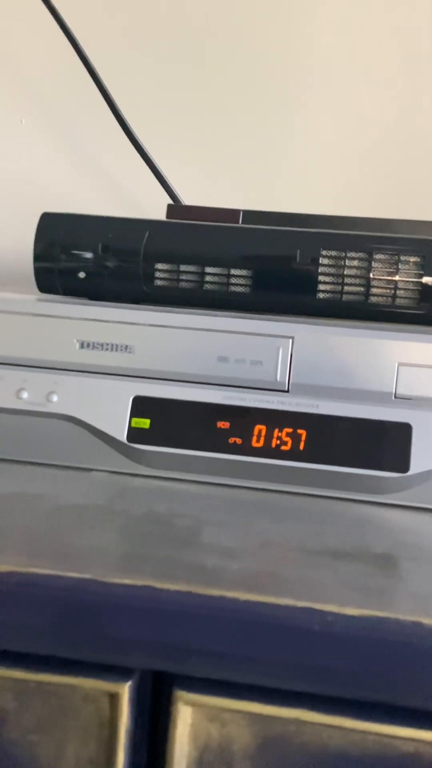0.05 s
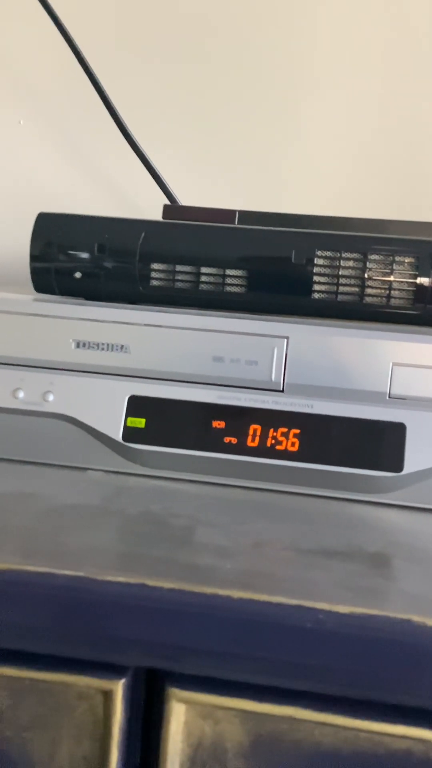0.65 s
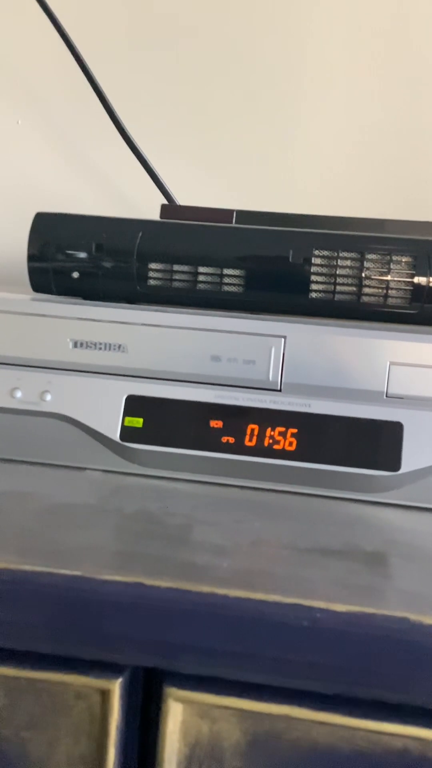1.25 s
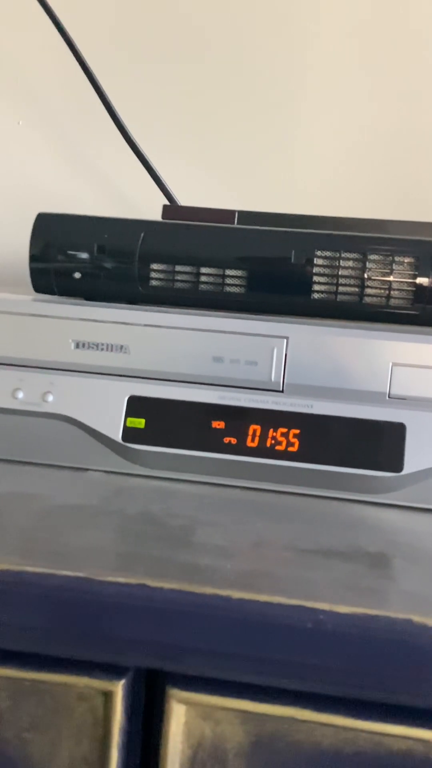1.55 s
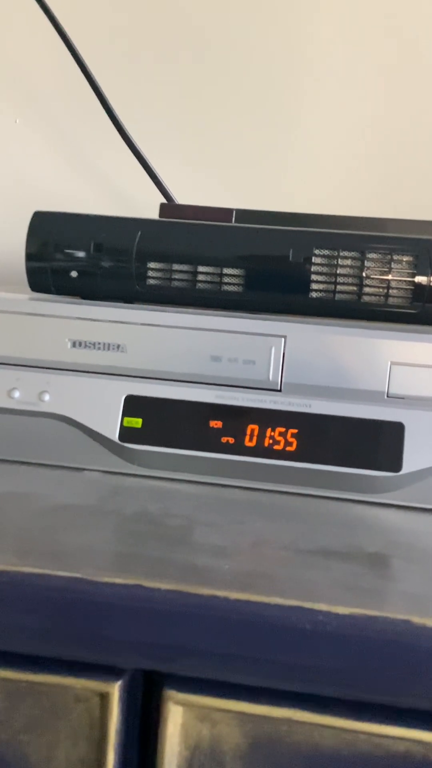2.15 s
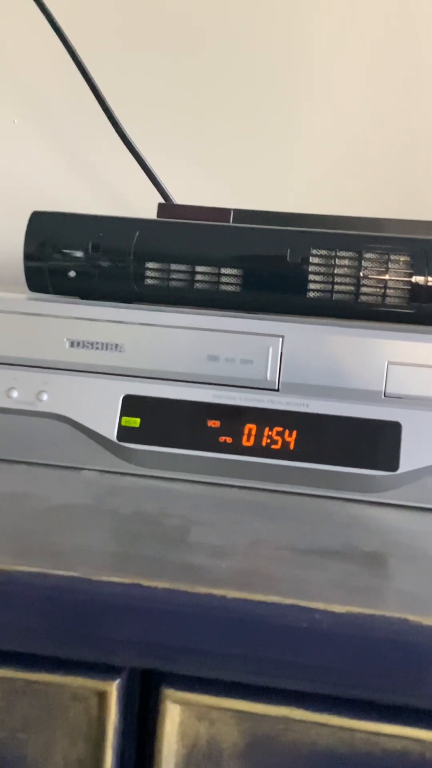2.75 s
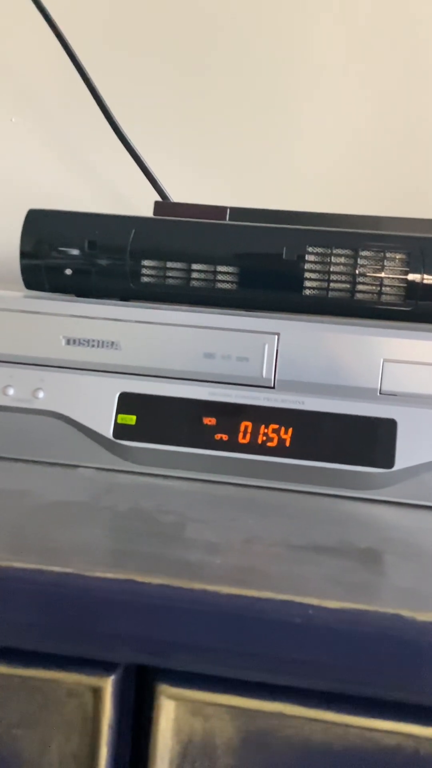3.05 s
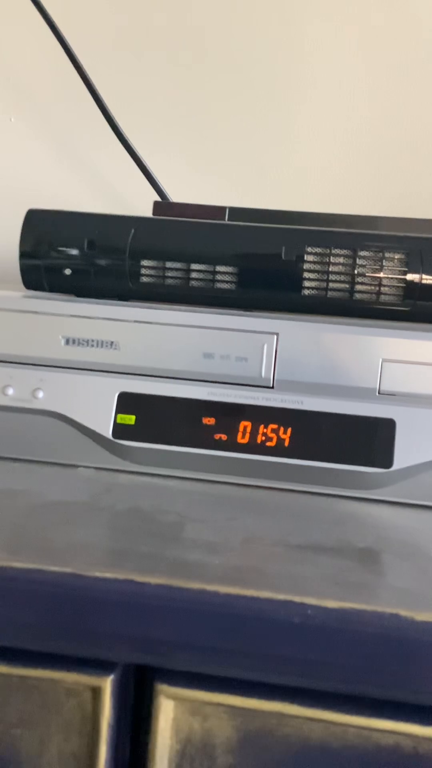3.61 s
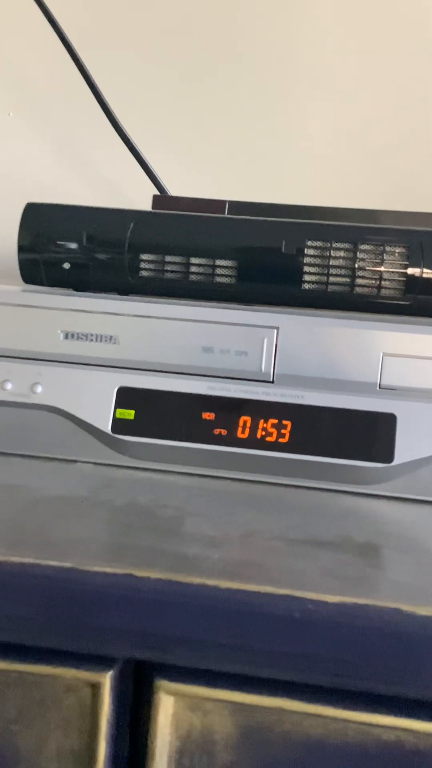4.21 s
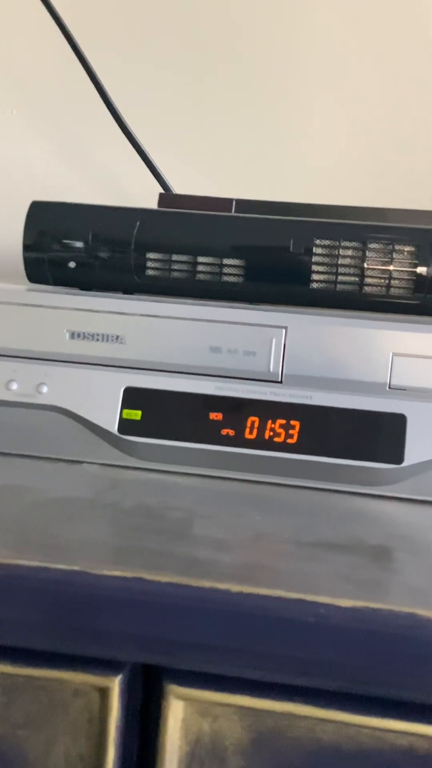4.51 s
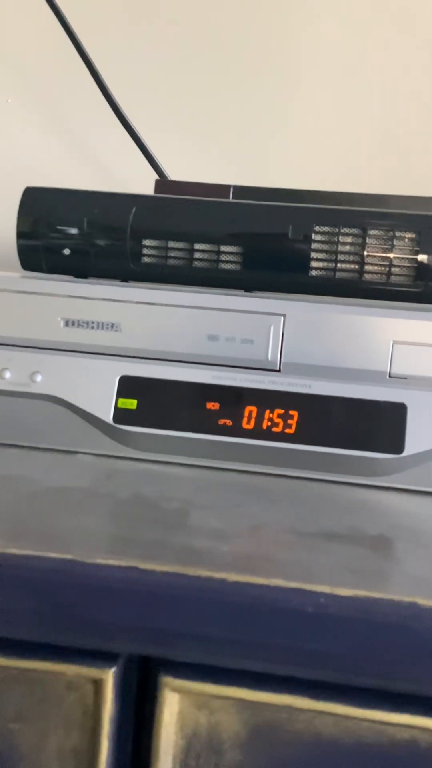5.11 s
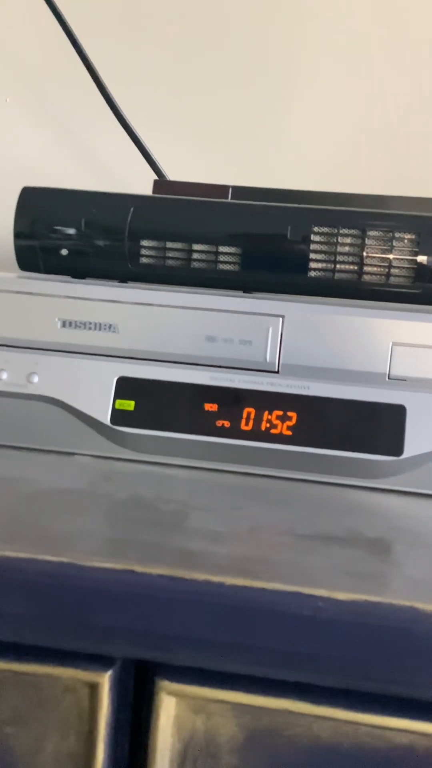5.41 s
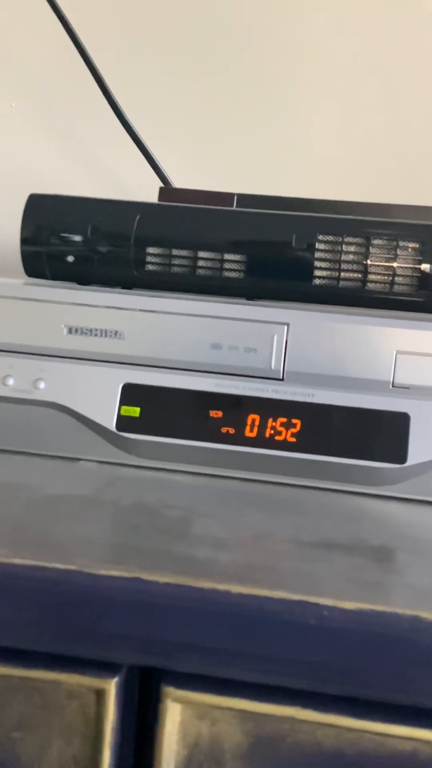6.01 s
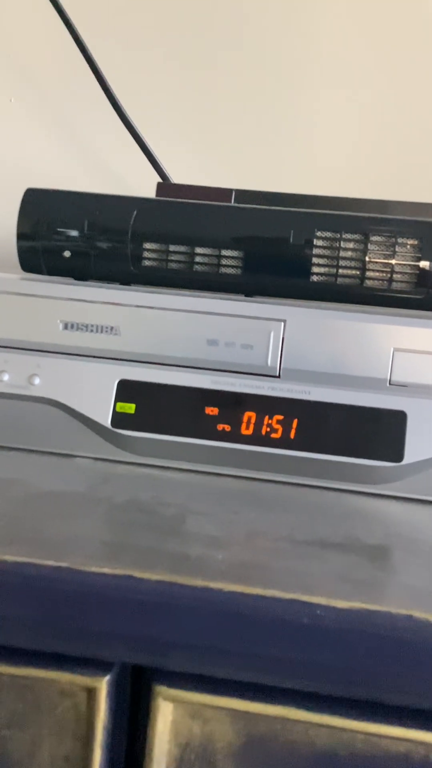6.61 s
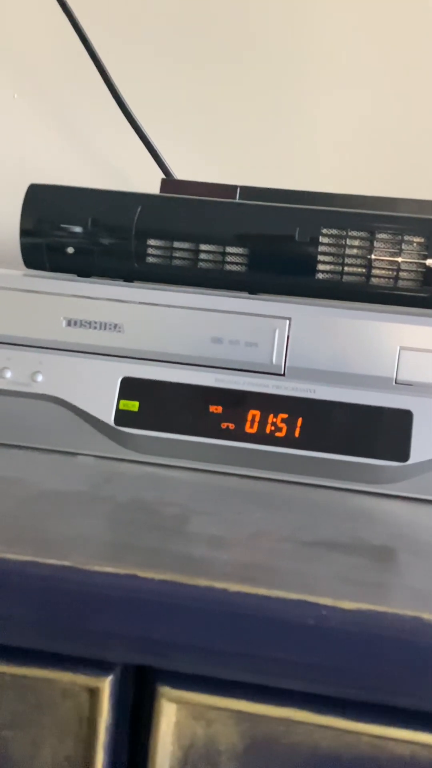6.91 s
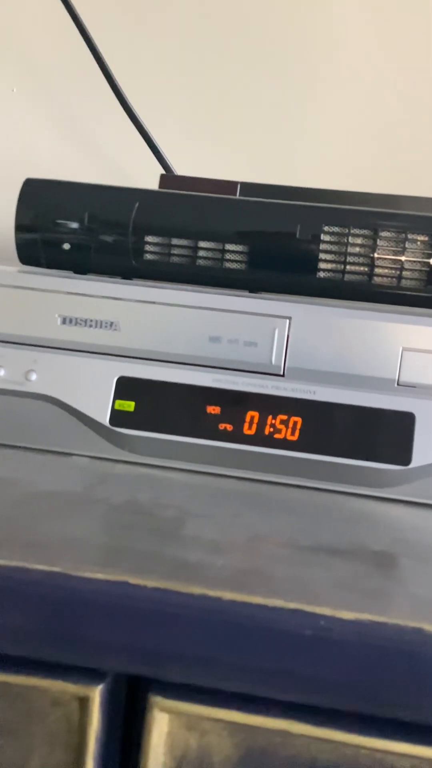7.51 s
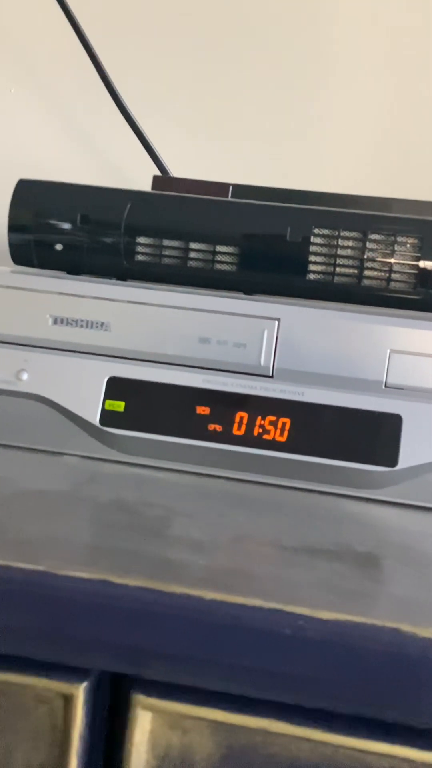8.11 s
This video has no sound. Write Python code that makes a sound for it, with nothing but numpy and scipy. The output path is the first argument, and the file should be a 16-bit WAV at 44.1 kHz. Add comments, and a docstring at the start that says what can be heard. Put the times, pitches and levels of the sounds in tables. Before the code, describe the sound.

A video cassette recorder rewinds a tape close by, with a steady motor whine, whirring hiss and rapid scraping that suddenly turns duller.

```python
"""In a quiet room, close by, a video cassette recorder rewinds a tape.
A reel scrapes twelve times a second, chopped by the drive wheel; the scraping is bright and ticks
at first, then suddenly turns duller. The motor whines and flutters once a turn, tape and bearings
whir, the gears hum, and the deck chatters and chirps under its load.
Underneath, a hand bumps and rustles softly, and a finger knocks twice on the casing."""
import sys
import numpy as np
from scipy import signal
from scipy.fft import rfft, irfft, next_fast_len
from scipy.io import wavfile
from scipy.ndimage import uniform_filter1d

SR = 44100
rng = np.random.default_rng(int(sys.argv[2]) if len(sys.argv) > 2 else 0)


def log_audio(samples):
    """Write samples as a 16-bit WAV file to the path given in sys.argv[1]."""
    # one column per channel
    frames = np.atleast_2d(samples).T
    # limit to full scale, then quantise
    limited = np.clip(frames, -1, 1)
    pcm = np.round(limited * 32767).astype(np.int16)
    wavfile.write(sys.argv[1], SR, pcm)


N = 368235
MOTOR_HZ, WHEEL_HZ, REEL_HZ = 24.958, 23.39, 12.203  # turns per second
ROUND_TURNS = 23  # wheel turns in one "round", after which reel and wheel are back in step


# how hard the wobbling reel presses (position [share of a turn], pressure [dB])
REEL_WOBBLE = [(0, 7), (.12, 12), (.18, 11.5), (.25, 3), (.32, 9.5), (.42, -5.5), (.61, -1.5), (.69, -0.5),
               (.76, 7.5), (.89, 7)]
# high spots of the drive wheel (position [share of a turn], pressure [dB])
WHEEL_SPOTS = [(0, 9), (.06, 2.5), (.18, -2), (.23, 12.5), (.3, -22), (.345, -20), (.38, 11), (.44, 4.5),
               (.55, -3.5), (.63, 8.5), (.68, 9.5), (.72, 3.5), (.92, 3)]
# how the dull scraping grows (time [s], relative level [dB])
DULL_LEVELS = [(0, -64), (3.4, -59.5), (3.7, -60.5), (6, -59.5), (8.35, -59.5)]
# tone of the dull scraping, the bright sizzle and the ticks (frequency [Hz], gain [dB])
DULL_TONE = [(2500, -35), (4400, -4.5), (5400, -34), (6350, -9), (6650, -5.5), (7200, -8.5), (8100, -22),
             (8700, -16.5), (9450, -1.5), (10050, -4), (10550, -16), (12850, -14.5), (13200, -10.5),
             (13750, -13), (14250, -18), (14600, -38)]
SIZZLE_TONE = [(4000, -56), (5600, -38), (6300, -14), (6600, -12), (7500, -4), (8550, -4.5), (9000, -5),
               (9450, 3.5), (10100, 0.5), (10600, -1.5), (11500, -2), (12000, -0.5), (12850, -10),
               (13200, -8), (13750, -8), (14200, -12), (14700, -50), (15600, -46)]
TICK_TONE = [(5000, -21), (6300, -13), (6700, -5.5), (8400, -21), (9400, 7), (10100, 4), (10900, -1),
             (12000, 4), (12800, -6), (13700, -1.5), (14600, -30), (15600, -31)]
# pitches at which the cassette shell and the cabinet ring (pitch [Hz], width [Hz], boost [dB])
SHELL_RINGS = [(6715, 184, 11), (7240, 130, 4.5), (9030, 230, 4), (9460, 270, 4.5), (9620, 110, -1),
               (10200, 150, 0.5), (10560, 160, -3), (11200, 130, 5), (11340, 210, -9), (12750, 250, -2),
               (13170, 250, 0.5)]
CABINET_RINGS = [(123, 26, -7.5), (254, 16, 1.5), (288, 25, 4.5), (354, 32, 1.5), (800, 16, -2),
                 (830, 40, 1.5), (1393, 72, -5), (1530, 120, 1), (1988, 56, -7), (2070, 43, 4),
                 (2173, 40, 3), (2337, 27, 6), (2414, 85, -10.5), (2506, 51, 6), (2680, 67, -7),
                 (2930, 69, 1.5), (3140, 53, 4), (3244, 52, -5), (3336, 64, 4), (3550, 82, -5),
                 (3850, 70, -3.5), (4960, 46, 0), (5710, 110, -4), (6150, 73, 2)]

def scrape(bright_db=-47.5, bright_until_s=3.478, slips_per_s=1200, slip_s=0.0032, contrast=0.79):
    """The reel rubs hardest where its wobble meets a high spot of the wheel, and rings the shell."""
    pressure = (per_turn(REEL_WOBBLE, REEL_HZ) * per_turn(WHEEL_SPOTS, WHEEL_HZ)) ** contrast
    # steady rubbing plus many tiny slips, each starting at once and dying in milliseconds
    slips = (rng.random(N) < slips_per_s / SR) * SR / slips_per_s
    decay = np.exp(-1 / (slip_s * SR))
    slipping = signal.lfilter([1 - decay], [1, -decay], slips * pressure ** 2)
    friction = unit(np.sqrt(0.56 * pressure ** 2 + slipping))
    caught = catches()
    grain = np.sign(rng.standard_normal((3, N)))
    dull = colour((friction + 0.65 * caught) * grain[0], DULL_TONE, SHELL_RINGS + CABINET_RINGS)
    dull *= amp(np.interp(seconds(), *np.transpose(DULL_LEVELS)) + 0.5)
    sizzle = colour(friction * grain[1], SIZZLE_TONE, SHELL_RINGS)
    ticks = colour(caught * grain[2], TICK_TONE, SHELL_RINGS) * rms(caught)
    sudden_stop = np.clip((bright_until_s - seconds()) / 0.0058, 0, 1)
    bright = (sizzle + ticks) * amp(bright_db) * sudden_stop
    return enclosure(moving_contact(dull + bright))


# moments when the reel catches (time into the round [s], strength [dB])
REEL_CATCHES = [(0.014, 13.5), (0.0588, 9), (0.069, 9), (0.082, 6), (0.099, 7), (0.144, 12.5),
                (0.1544, 9.5), (0.1862, 12.5), (0.2295, 5), (0.272, 8), (0.316, 9.5), (0.4002, 11.5),
                (0.425, 14.5), (0.4864, 8), (0.4974, 10.5), (0.5536, 6.5), (0.6384, 3), (0.657, 13.5),
                (0.7425, 13.5), (0.7966, 8), (0.8802, 7), (0.913, 13.5), (0.966, 6)]

def catches(hold_s=0.0027):
    """Force of the stronger slips: the same high spots meet in every round and hold for a moment."""
    return in_each_round(REEL_CATCHES, hold_s, sharp_start=True)


# rings of the shell that come and go (pitch [Hz], width [Hz])
CONTACT_RINGS = [(9100, 390), (10100, 320), (12000, 350), (13300, 450)]

def moving_contact(sound, swing_db=3, swing_hz=30):
    """As the point of contact moves, it favours other rings of the shell, so no two strokes match."""
    out = sound
    for hz, width in CONTACT_RINGS:
        band = signal.butter(1, [hz - width / 2, hz + width / 2], "band", fs=SR, output="sos")
        gain = amp(swing_db * np.clip(wander(swing_hz), -2, 2))
        out = out + signal.sosfilt(band, sound) * (gain - 1)
    return out


def enclosure(sound, echo_db=-12, fade_s=0.074):
    """The machine's walls add a cloud of quickly dying echoes; the overall power stays the same."""
    age = np.arange(SR // 4) / SR
    echoes = rng.standard_normal(len(age)) * die_away(age, fade_s)
    response = echoes * amp(echo_db) / np.linalg.norm(echoes)
    response[0] = 1  # the direct sound
    return signal.fftconvolve(sound, response)[:N] / np.linalg.norm(response)


def motor_whine(level_db=-51.5, rise_db=1.5, flutter=0.45, throb=0.051, drift=0.054):
    """The motor sings at 48 times its turning rate; it slows and weakens once in every turn."""
    turn = 2 * np.pi * MOTOR_HZ * seconds()
    phase = 48 * turn + flutter * np.sin(turn) + drift * wander(5.8)
    tone = np.sin(phase) * (1 + throb * np.cos(turn))
    return unit(tone) * amp(level_db + rise(rise_db))


# tone of the running tape and bearings (frequency [Hz], gain [dB])
WHIR_TONE = [(30, -28), (60, -20), (130, -4.5), (270, -3.5), (430, -4.5), (770, -1), (850, 4), (1060, 2),
             (1220, 6), (1400, 3), (2250, .5), (2420, -2), (3500, -6), (4600, -3.5), (6400, -7.5),
             (8100, -16), (14000, -72)]

def whir(level_db=-55.5, rise_db=1, repeat=0.37):
    """Tape and bearings hiss in the cabinet; part of the roughness returns every second wheel turn."""
    repeating = np.resize(rng.standard_normal(int(2 * SR / WHEEL_HZ)), N)
    roughness = rng.standard_normal(N) + repeat * repeating
    return colour(roughness, WHIR_TONE, CABINET_RINGS) * amp(level_db + rise(rise_db))


# load on the deck as the wheel turns (position [share of a turn], load [dB])
DECK_LOAD = [(.1, -3), (.26, 1), (.3, 0), (.39, -3), (.45, 2.5), (.49, -3.5), (.53, 4.5), (.58, -1.5),
             (.69, 4), (.75, -2.5), (.97, -5)]
# tone of the shaking deck (frequency [Hz], gain [dB])
CHATTER_TONE = [(1500, -24), (2200, -5), (2500, -6), (3800, -8), (4250, -5), (4750, -5), (5400, -6),
                (6400, -14), (6700, -5.5), (7150, 1.5), (7700, -39)]
# pitches at which the deck plate rings (pitch [Hz], width [Hz], boost [dB])
DECK_RINGS = [(4330, 150, 9), (4400, 48, -9), (4640, 106, 9.5), (4860, 71, 0), (5600, 55, 6),
              (5950, 90, 12)]

def deck_chatter(level_db=-59.5, rise_db=2, follow=0.46):
    """The heavier deck answers each turn of reel and wheel with a soft swell, lower than the scrape."""
    pressure = unit(per_turn(REEL_WOBBLE, REEL_HZ) ** follow * per_turn(DECK_LOAD, WHEEL_HZ))
    shaking = colour(pressure * rng.standard_normal(N), CHATTER_TONE, CABINET_RINGS + DECK_RINGS)
    return shaking * amp(level_db + rise(rise_db))


# tones of the gears (pitch [times the wheel's turning rate], relative level [dB])
GEAR_TONES = [(11, -78), (12, -73.5), (15, -76.5), (16, -81), (24, -78), (27, -79), (27.5, -80), (35, -74),
              (35.5, -76), (36, -76), (36.5, -79), (38, -75), (39, -72), (39.5, -78), (43, -78), (47, -78),
              (48, -72), (80, -78), (95, -77), (96, -73), (120, -76.5), (160, -77), (160.5, -81),
              (239, -79)]

def gear_hum(drift=0.63, roughness=0.47, waver_db=1.4):
    """Gear teeth meet in rhythm and make faint tones, each wavering and rattling a little."""
    out = np.zeros(N)
    for multiple, db in GEAR_TONES:
        phase = 2 * np.pi * (multiple * WHEEL_HZ * seconds() + rng.random()) + drift * wander(4)
        rattle = unit(1 + roughness * wander(45))
        out += np.sqrt(2) * np.sin(phase) * rattle * amp(db + 0.1 + waver_db * wander(9))
    return out


# peaks of the load on the deck (time into the round [s], relative level [dB])
LOAD_PEAKS = [(.15, -54.5), (.236, -59), (.262, -56), (.33, -57), (.408, -57.5), (.742, -59.5),
              (.975, -59.5)]
# tone of a chirp (frequency [Hz], gain [dB])
CHIRP_TONE = [(3700, -31), (4250, -1), (4700, -3), (5300, -34.5)]

def deck_chirps(gain_db=-2, width_s=0.0075, scatter_db=2, rise_db=4):
    """When the load peaks, the deck plate's two lowest rings chirp, louder as the tape winds on."""
    strength = amp(gain_db + scatter_db * wander(8) + rise(rise_db))
    force = in_each_round(LOAD_PEAKS, width_s) * strength
    return colour(force * rng.standard_normal(N), CHIRP_TONE, DECK_RINGS) * rms(force)


# a finger knocks twice and settles (time [s], strength [dB], pitch [times the casing's own])
FINGER_KNOCKS = [(5.955, -37, 0.85), (5.977, -33, 0.97), (6.014, -53, 1)]
# notes of the casing (pitch [Hz], relative level [dB], time to fade by 60 dB [s])
CASING_NOTES = [(227, 3.5, 0.025), (536, 5, 0.024), (686, -1.5, .025), (880, -7, 0.03)]

def knocks(attack_s=0.0037):
    """Soft blows of a fingertip make the casing ring briefly."""
    out, age = np.zeros(N), np.arange(SR // 10) / SR
    soft_start = 1 - np.exp(-age / attack_s)
    for time_s, db, pitch in FINGER_KNOCKS:
        ring = sum(amp(note_db) * np.sin(2 * np.pi * hz * pitch * age) * die_away(age, fade_s)
                   for hz, note_db, fade_s in CASING_NOTES)
        start = int(time_s * SR)
        out[start:start + len(age)] += amp(db) * ring * soft_start
    return out


# finger thuds (time [s], level [dB], first pitch [Hz], last pitch [Hz], length [s])
FINGER_BUMPS = [(.002, -52, 164, 151, 0.11), (.675, -55, 326, 71, .08), (1.633, -60, 72, 62, 0.086),
                (4.941, -53.5, 328, 96, 0.038), (5.03, -50.5, 457, 302, 0.01),
                (5.034, -48, 180, 107, 0.026)]

def bumps():
    """Fingers rub and thud on the casing; each short thud slides down in pitch."""
    out = np.zeros(N)
    for time_s, db, first_hz, last_hz, length_s in FINGER_BUMPS:
        progress = np.linspace(0, 1, int(length_s * SR))
        phase = 2 * np.pi * np.cumsum(first_hz * (last_hz / first_hz) ** progress) / SR
        swell = np.sin(np.pi * np.sqrt(progress))
        start = int(time_s * SR)
        out[start:start + len(progress)] += amp(db) * swell * np.sin(phase)
    return out


# shifts of grip (middle time [s], level [dB], half length [s], low edge [Hz], high edge [Hz])
GRIP_SHIFTS = [(.01, -51.5, 0.025, 119, 310), (0.276, -57.5, 0.1, 110, 312), (0.74, -59.5, 0.055, 110, 340),
               (1.72, -62.5, 0.042, 60, 330), (3.618, -72, 0.037, 45, 103), (4.046, -61.5, 0.022, 90, 261),
               (4.42, -64.5, 0.15, 152, 400), (4.602, -66, 0.091, 54.5, 280),
               (5.086, -69, 0.076, 55.7, 140), (5.41, -64.5, 0.049, 79, 348), (5.606, -70, 0.032, 50, 130),
               (6.012, -56, 0.032, 50, 305), (6.36, -67, 0.055, 49.5, 127), (6.83, -69, 0.05, 70.5, 255),
               (7.272, -66, 0.034, 44.5, 95), (7.71, -67, .038, 48.3, 130)]

def grip_rustle():
    """The hand holding the microphone shifts its grip, making swells of low rustle."""
    t, out = seconds(), np.zeros(N)
    for middle_s, db, half_s, low_hz, high_hz in GRIP_SHIFTS:
        band = signal.butter(2, [low_hz, max(high_hz, 2 * low_hz)], "band", fs=SR, output="sos")
        rustle = unit(signal.sosfilt(band, rng.standard_normal(N)))
        out += amp(db) * bell(t - middle_s, half_s) * rustle
    return out


# tone of restless fingers (frequency [Hz], gain [dB])
FIDGET_TONE = [(30, -16), (65, 1), (120, -13), (250, -14), (500, -44)]

def fidget(level_db=-83.5, rise_db=6):
    """The fingers never quite rest: a faint, low rustle slowly grows."""
    growth = unit(amp(rise(rise_db)))
    return colour(rng.standard_normal(N), FIDGET_TONE) * growth * amp(level_db)


def amp(db):
    return 10 ** (np.asarray(db) / 20)


def seconds():
    return np.arange(N) / SR


def rms(sound):
    """Average strength of a sound (root mean square)."""
    return np.sqrt(np.mean(sound ** 2))


def unit(sound):
    return sound / rms(sound)


def rise(total_db):
    """A steady climb in dB from start to end, passing zero halfway."""
    return total_db * np.linspace(-.5, .5, N)


def bell(offset_s, width_s):
    return np.exp(-(offset_s / width_s) ** 2 / 2)


def die_away(age, fade_s):
    """A fade that drops 60 dB in fade_s."""
    return np.exp(-np.log(1000) * age / fade_s)


def wander(rate_hz):
    """Smooth random wandering with a typical size of 1."""
    hold = int(SR / rate_hz)
    steps = np.repeat(rng.standard_normal(N // hold + 1), hold)
    return unit(uniform_filter1d(uniform_filter1d(steps, hold), hold)[:N])


def colour(sound, tone, rings=()):
    """Shape a sound with a broad tone and narrow rings; the result has an average strength of 1."""
    size = 2 * next_fast_len(N // 2 + SR // 10)
    freqs = np.maximum(np.fft.rfftfreq(size, 1 / SR), 1)
    hz, db = np.transpose(tone)
    gain_db = np.interp(np.log(freqs), np.log(hz), db)
    for pitch, width, boost in rings:
        gain_db += boost / (1 + (2 * (freqs - pitch) / width) ** 2)
    # a minimum-phase filter: the ringing comes only after its cause
    cepstrum = irfft(np.log(amp(gain_db)))[:size // 2]
    response = np.exp(2 * rfft(cepstrum, size))
    return unit(irfft(rfft(sound, size) * response)[:N])


def per_turn(pattern, turn_hz):
    """A pattern of strong and weak spots that comes round with every turn of a shaft."""
    return amp(np.interp(seconds() * turn_hz, *np.transpose(pattern), period=1))


def in_each_round(swells, width_s, sharp_start=False):
    """Bell-shaped swells that return in every round; with sharp_start, each begins at its top."""
    t, round_s, out = seconds(), ROUND_TURNS / WHEEL_HZ, np.zeros(N)
    lead_s = 0 if sharp_start else round_s / 2
    for time_s, db in swells:
        age = (t - time_s + lead_s) % round_s - lead_s
        out += amp(db) * bell(age, width_s)
    return out


def scene():
    """The machine and the hand sound together in one channel."""
    machine = scrape() + motor_whine() + whir() + deck_chatter() + gear_hum() + deck_chirps()
    hand = knocks() + bumps() + grip_rustle() + fidget()
    return (machine + hand)[None]


def record(dry, low_cut_hz=52, high_cut_hz=15700):
    """The microphone drops the deep bass; the highest treble is cut steeply."""
    thin = signal.sosfilt(signal.butter(4, low_cut_hz, "high", fs=SR, output="sos"), dry)
    return signal.sosfilt(signal.ellip(8, .2, 70, high_cut_hz, fs=SR, output="sos"), thin)


dry = scene()
out = record(dry)
log_audio(out)
```